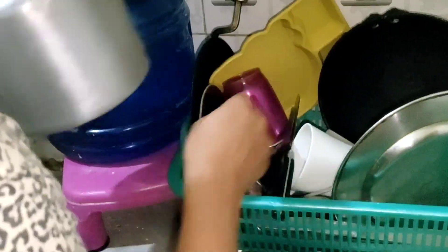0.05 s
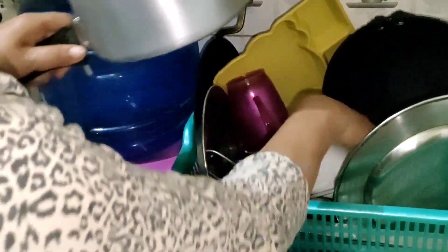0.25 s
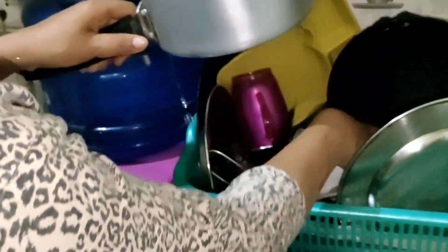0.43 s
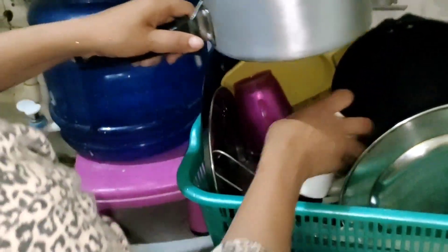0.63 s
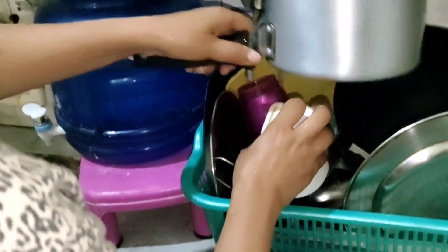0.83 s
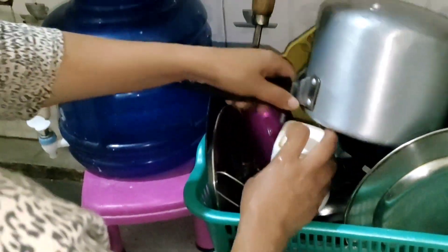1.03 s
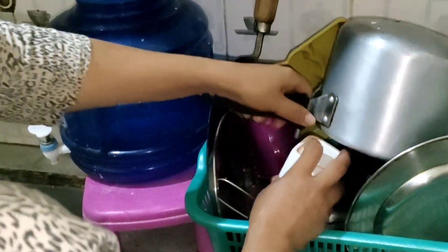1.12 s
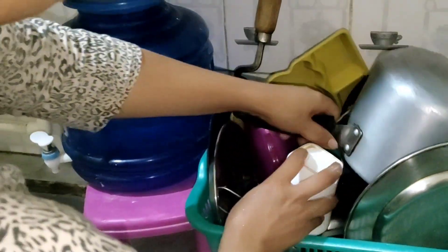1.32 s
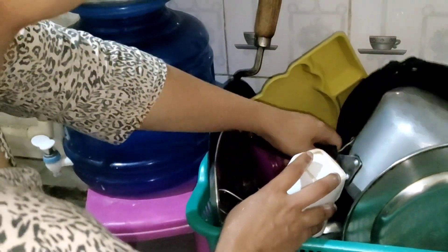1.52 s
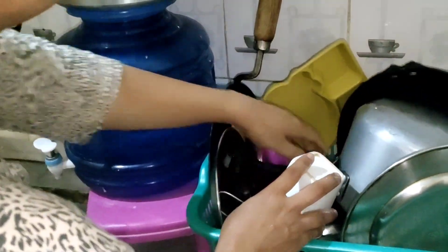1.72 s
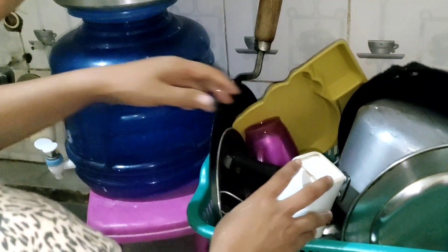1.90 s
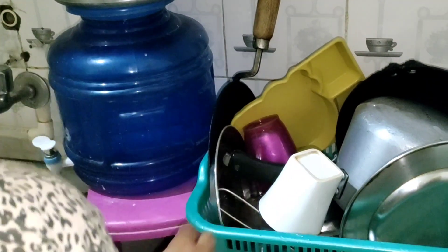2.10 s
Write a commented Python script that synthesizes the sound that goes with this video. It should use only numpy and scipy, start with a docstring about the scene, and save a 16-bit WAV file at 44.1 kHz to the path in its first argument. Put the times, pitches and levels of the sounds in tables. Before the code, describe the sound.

Metal pots and dishes clatter as they are put into a plastic rack. Light ticks open, with firmer knocks from 0.2 s and a dense, loud clatter at 0.55-0.75 s. After a lull, sharp clanks hit around 1.05-1.2 s; another pause, then a run of lower, ringing knocks from 1.48 to 1.85 s fades to faint ticks. Close, hard-walled kitchen, slight clipping, faint hum and hiss.

```python
"""In a small tiled kitchen, washed metal pots and dishes knock together as they are set into a plastic rack.
Each knock is a short click with its own pitch; it rings the pots a little and the hard walls draw it out.
Single pitched notes, mostly short, sound with the knocks: sine waves that start softly and die away.
Two low bands of hum, made of unsteady sine waves, waver over a faint hiss of shaped noise.
The close microphone pair clips on the loudest knocks."""
import sys
import numpy as np
from scipy import signal
from scipy.fft import rfft, irfft, next_fast_len
from scipy.io import wavfile
from scipy.ndimage import uniform_filter1d, map_coordinates

SR = 44100
rng = np.random.default_rng(int(sys.argv[2]) if len(sys.argv) > 2 else 0)


def persist_wave(psi):
    """Save psi, clipped to +-1, as 16-bit WAV."""
    counts = np.round(np.clip(psi, -1, 1) * 32767).astype(np.int16)
    wavfile.write(sys.argv[1], SR, np.atleast_2d(counts).T)


N = 94815  # length in samples
TOP_HZ = 15600  # nothing above this is kept

# How far the left microphone leads the right: (frequency [Hz], lead [radians])
LEAD = [(20, 0), (250, 0), (450, -1), (700, -1.3), (950, 1.1), (1300, 1.8), (1600, 3.5), (2330, 5.8),
        (2930, 5.8), (5000, 7.6), (15000, 7.9)]
# How much louder the left microphone is than the right: (frequency [Hz], level difference [dB])
TILT = [(60, -1), (110, 6), (200, 0), (380, 2), (700, 1.5), (1290, -0.5), (2380, 5.5), (4400, 3),
        (8120, -2.5), (15000, 2.5)]
# One half of a left-right difference for each side
HALVES = np.array([[0.5], [-0.5]])


def amp(db):
    """Turn decibels into a gain."""
    return 10 ** (np.asarray(db) / 20)


def unit(x):
    """Scale a signal to an rms of 1."""
    return x / np.sqrt(np.mean(np.abs(x) ** 2) + 1e-20)


def along(points, hz):
    """Read a curve of (frequency, value) points, spaced as the ear hears pitch (log axis)."""
    point_hz, value = np.transpose(points)
    return np.interp(np.log(hz + 1), np.log(point_hz + 1), value)


def resonance(f, hz, width_hz):
    """One ringing mode as a filter that starts at the hit; it is 1 at its peak, and narrower rings longer."""
    return 1j * f * width_hz / (hz * hz - f * f + 1j * f * width_hz)


def ports(pair, f):
    """Mix two unrelated spectra into left and right with the pair's likeness, level and phase differences."""
    # How alike left and right are: (frequency [Hz], likeness [0 to 1])
    alike = [(100, .97), (300, 0.84), (700, 0.4), (1400, 0.23), (2500, 0.51), (5000, 0.25), (15000, 0.21)]
    turn = np.arccos(np.clip(along(alike, f), 0, 1)) / 2
    mid, side = pair * [np.cos(turn), np.sin(turn)]
    skew = amp(along(TILT, f) / 2) * np.exp(0.5j * along(LEAD, f))
    return np.array([(mid + side) * skew, (mid - side) / skew])


def hiss():
    """Faint steady noise: random samples are shaped over frequency and spread over the microphone pair."""
    # Shape of the hiss: (frequency [Hz], relative level per Hz [dB])
    hiss_shape = [(20, 1), (60, -9), (130, 5), (170, -28), (240, -35), (450, -23), (1000, -12),
                  (1500, -7.5), (2600, -9), (3500, -6), (5000, -20.5), (9000, -20), (13000, -13.5),
                  (15600, -26)]
    level_db = -39.5
    m = next_fast_len(N + 8192)
    f = np.fft.rfftfreq(m, 1 / SR)
    white = rfft(rng.standard_normal((2, m)))
    shaped = ports(white, f) * amp(along(hiss_shape, f))
    return amp(level_db) * unit(irfft(shaped, m)[:, :N])


def wobble(rate):
    """A smooth random curve through `rate` random points a second."""
    points = rng.standard_normal(int(N * rate / SR) + 4)
    return map_coordinates(points, [np.arange(N) * rate / SR])


def hum():
    """Two low groups of sines whose pitch and level wander; each group swells on its own."""
    # Swell of the two groups: (time [s], lower band level [dB], upper band level [dB])
    swell = [(0.0, -58, -25.5), (0.05, -39, -26), (0.13, -62, -28), (0.26, -25, -32), (0.33, -25.5, -34),
             (0.43, -39, -36.5), (0.52, -29, -36), (0.59, -31.5, -34), (0.69, -43, -35), (0.82, -40, -62),
             (0.86, -68, -45.5), (0.99, -50, -33), (1.12, -46, -37), (1.17, -49, -29), (1.23, -46, -33.5),
             (1.29, -59, -38), (1.32, -45, -36), (1.54, -30.5, -42), (1.58, -40, -34), (1.71, -41, -37),
             (1.75, -37, -38.5), (1.89, -34.5, -29.5), (1.96, -46, -35), (1.99, -38, -35.5),
             (2.08, -61, -33), (2.15, -41, -42)]
    # Tones of the lower group: (frequency [Hz], relative level [dB])
    low_tones = [(89.2, -0.5), (49, -15)]
    # Tones of the upper group: (frequency [Hz], relative level [dB])
    high_tones = [(231.2, 3), (258, -2), (321, -14.5), (131, -7.5), (385, -21)]
    pitch_wander, level_wander_db = 0.0199, 4  # pitch as a share of the frequency
    wander_rate = 9.8  # random points a second
    s, *levels = np.transpose(swell)
    out = np.zeros((2, N))
    for level, band in zip(levels, [low_tones, high_tones]):
        tones = 0
        for hz, db in band:
            moving_hz = hz * (1 + pitch_wander * wobble(wander_rate))
            phase = 2 * np.pi * (np.cumsum(moving_hz) / SR + rng.random())
            tilt_db = along(TILT, hz) * HALVES
            tone_db = db + tilt_db + level_wander_db * wobble(wander_rate)
            tones = tones + amp(tone_db) * np.sin(phase)
        out += amp(np.interp(np.arange(N) / SR, s, level)) * unit(tones)
    return out


def kitchen(size, sharp_db, hold_s, soft):
    """A fresh room answer: a crack, first echoes, a patchy, steady start of the tail, then a fade by band."""
    # How long the room rings: (frequency [Hz], time to fall by 60 dB [s])
    room_decay = [(150, 0.33), (500, 0.34), (1500, 0.3), (4000, 0.33), (9000, 0.26), (15000, 0.26)]
    direct_s = 0.012  # the first echoes fall by 60 dB in this time
    hard_fill_s, soft_fill_s = 0.0021, 0.0079  # how slowly the tail builds up
    patchy_db, crack_db = 2, 7
    hz, t, z = signal.stft(rng.standard_normal((2, size)), SR, nperseg=128)

    # Random patches over frequency and time
    patches = uniform_filter1d(rng.standard_normal(z.shape[1:]), size=3, axis=0)
    patches = unit(uniform_filter1d(patches, size=5, axis=1))
    fading_db = -60 * np.maximum(t - hold_s, 0) / along(room_decay, hz)[:, None]
    patchy = z * amp(fading_db + patchy_db * patches)
    tail = signal.istft(patchy, SR, nperseg=128)[1][:, :size]

    t = np.arange(size) / SR
    fill_s = soft_fill_s if soft else hard_fill_s
    first = amp(sharp_db) * hard_fill_s / fill_s
    build_up = 1 - np.exp(-t / fill_s)
    tail = tail * (build_up + first * amp(-60 * t / direct_s))
    tail[0, 0] += first * amp(crack_db)  # one sharp sample, in the part both sides share
    return tail


def knocks():
    """Each contact is a coloured click plus its own short pitches and the pot modes, all through the room."""
    # The knocks: (time [s], level before the shared gain [dB], own pitch [Hz],
    #  low middle over middle [dB], treble over middle [dB], thump over middle [dB],
    #  left minus right [dB], high pitch [Hz], own pitch strength [dB],
    #  high pitch strength before its limit [dB], sharpness [dB], time the tail holds before it fades [s])
    knock_table = [(0.0159, -21.5, 1150, -6, -7, -2, 0, 4000, 11.5, -3, 20.5, 0.026),
                   (0.0512, -21.5, 2450, -45, -5.5, -4, 0, 4030, 9, -15, 9, 0.026),
                   (0.1301, -23, 2340, -14, -1.5, -5, 0.5, 4010, -6, -6, 10, 0.017),
                   (0.1674, -30.5, 3100, -2.5, 0.5, 5, 3, 4000, 16, 1, 23, 0.011),
                   (0.2153, -16, 3400, -34, -8, -28, 0, 13300, 14.5, 10, 4, 0.017),
                   (0.2303, -6, 2610, -4, -2.5, -9, 1, 12700, -3, 16, 6.5, 0.0051),
                   (0.3097, -15.5, 2490, 0.5, -4, -2.5, 1.5, 4170, 12.5, 2, 10, 0.012),
                   (0.328, -16, 2230, -3, -3, -10, 1.5, 4040, 13, -5, 6, 0.0082),
                   (0.398, -17, 1098, -2.5, -3.5, -12, -4.5, 4060, 18.5, -5, 12, 0.017),
                   (0.4225, -8, 2783, -3.5, -8.5, -31, 2, 5600, 15, 10, 3.5, 0.033),
                   (0.4651, -6, 1140, -4, -10.5, -17, 3, 4180, -2, -20, -3, 0.036),
                   (0.4888, -10.5, 2810, -1.5, -7.5, -21, 3, 4030, 10, -24, 9.5, 0.0083),
                   (0.5098, -14, 1260, -6, -2, -16, -4, 4120, 9, -12, 0, 0.014),
                   (0.5672, -14, 2440, -2, -4.5, -10, 3, 4390, 13, -5, 5, 0.015),
                   (0.5828, 3, 1130, -5.5, -4.5, -12.5, 0.5, 14800, -6, 9, 1, 0.018),
                   (0.6094, 0, 2330, -5.5, -2, -39, -5, 14800, -1, 18, 6, 0.012),
                   (0.6348, -1.5, 3020, -1.5, -4.5, -36, 4, 4350, -7, -3, 2, 0.0082),
                   (0.6593, -6.5, 2920, -9, -2.5, -20, 1.5, 4160, -13, 11, 1, 0.036),
                   (0.7086, -2, 1923, -3, -1, -18, -0.5, 4030, 9, 11, 6.5, 0.014),
                   (0.7338, -7.5, 2410, -5, -2.5, -11, 4.5, 4180, -6, 11, 12.5, 0.014),
                   (0.9146, -22.5, 3206, -13.5, -1, -4, 1, 4220, 14.5, 13, 3, 0.036),
                   (0.9549, -22.5, 3210, -21, 2, -3.5, -1, 4120, 14, 13, 3, 0.012),
                   (0.9966, -23, 1190, -4.5, 3.5, -12, 1.5, 4040, 14, 15, 3, 0.036),
                   (1.058, -8, 2960, -6.5, 2, -14, -1, 5570, 14, 1, 3, 0.0067),
                   (1.0809, -12, 2960, -14, -3.5, -25, 4.0, 4300, -4, 10, 11, 0.0087),
                   (1.1132, 4, 2380, -5, -3, -28, -1, 6280, 2.5, 9, 9.5, 0.0068),
                   (1.139, -2.5, 717, -1.5, -0.5, -13, 1, 5640, 9.5, 11, 1, 0.0087),
                   (1.1701, -4.5, 2800, -15, -1, -10, 1.5, 14800, -14, 13, 8, 0.0066),
                   (1.28, -13, 2720, -33, -15, -16, 2.5, 4630, -16, 8, 4, 0.0074),
                   (1.3835, -40, 2520, -21, -23, -1, 5, 4170, 9, 4, 3, 0.012),
                   (1.4397, -27, 1900, -12, 1, -16, 5.5, 14600, 6, 8, -2, 0.03),
                   (1.4756, -16, 1180, -8.5, -2, -10, -4, 4600, 27, 10, 7, 0.012),
                   (1.4853, -2.5, 825, -3, -3.5, -7.5, 1.5, 12500, 15.5, 14, -6, 0.014),
                   (1.5095, -0.5, 670, -9, -6, -9.5, 0, 4390, 12.5, 2, 7, 0.0093),
                   (1.5301, -8, 690, -24, 1, -6, 1, 14100, 18, 6, 4, 0.012),
                   (1.5704, -5.5, 740, -0.5, -3, -8.5, 1, 4350, 8, 10, 2, 0.031),
                   (1.6, -3.5, 770, -6, -6, -5, 0, 4290, 6, 11, 0, 0.012),
                   (1.6188, -6, 1030, -12, -3.5, -35, 0.5, 4240, 18, 12, -1, 0.036),
                   (1.6701, -3.5, 818, -4.5, -6, -16.5, 3, 4270, 11, -2, -5, 0.022),
                   (1.6946, -2.5, 1150, -9.5, -3, -24, -2, 4280, 7, -6, -2, 0.019),
                   (1.7199, -4.5, 1020, -4.5, -5, -11, 1, 4850, 6, 6, 2.5, 0.0092),
                   (1.7449, -13, 780, -11.5, 1.5, -11, 1, 4060, 16, -1, -12, 0.019),
                   (1.8131, -2.5, 2440, -9, 2, -24, 0.5, 4120, -18, 11, 3.5, 0.019),
                   (1.8489, -9, 3000, -7.5, 5, -14.5, 2.5, 12900, -5, 21, 5, 0.016),
                   (1.891, -19, 2320, -31, 3, -5, -3, 14300, 1, 9, 21, 0.0075),
                   (2.0515, -24.5, 2790, -31, -1.5, -3, 2.5, 4850, 16.5, 10, 18, 0.0083),
                   (2.064, -39, 2240, -24, -29.5, -8.5, 3.0, 4750, 11, 15.5, 3, 0.011),
                   (2.1239, -38.5, 2830, -30, 15, 8, 2, 4910, 9, 16, 9, 0.012)]
    # Colour of the click inside each band: (frequency [Hz], relative level per Hz [dB])
    click_shape = [(60, -40), (120, -23), (240, -13), (430, -10), (650, -5), (1100, -1), (1400, -3),
                   (2000, -3.5), (3000, -5), (3600, -11.5), (4300, -12), (5000, -18), (6400, -15.5),
                   (8500, -22), (11000, -18.5), (13000, -16), (15000, -18.5), (15600, -16)]
    # Ringing modes of the pots: (frequency [Hz], width [Hz], middle level over the click [dB])
    pots = [(235, 39, 4), (610, 24.7, -1.5), (694, 10.4, 4.5), (850, 25, -1), (1128, 42, -0.5),
            (1860, 23, -3.5), (2296, 40, -1.5), (2524, 35, -2.5), (2690, 25, -1.5), (3056, 51, 0),
            (4303, 15, 4)]
    pot_scatter_db = 2.5  # each knock rings the modes a little differently
    low_middle_hz, middle_hz, treble_hz = 430, 1400, 4600  # where these bands start
    own_width_hz, high_width_hz, high_most_db = 60, 40, 9
    shared_gain_db, soft_below_db = -5.5, -15.5

    size, lead = 28672, 512  # samples; the lead leaves space ahead of the hit for phase shifts
    m = 2 * size
    f = np.fft.rfftfreq(m, 1 / SR)
    out = np.zeros((2, N + m))
    middle_bins = np.sum((f > middle_hz) & (f < treble_hz))
    edges = [100, low_middle_hz, middle_hz, treble_hz, TOP_HZ]
    bands = [slice(*np.searchsorted(f, e)) for e in zip(edges[:-1], edges[1:])]
    click = amp(along(click_shape, f))
    power = [np.sum(click[b] ** 2) for b in bands]
    modes = np.array([amp(db) * resonance(f, hz, width) for hz, width, db in pots])

    for (s, db, hz, low_db, treble_db, thump_db, pan_db, high_hz,
         own_db, high_db, sharp_db, hold_s) in knock_table:
        # Set the strength of each band, then smooth the steps between bands
        gains = np.full(len(f), amp(thump_db) / np.sqrt(power[0]))
        for b, p, band_db in zip(bands[1:], power[1:], [low_db, 0, treble_db]):
            gains[b.start:] = amp(band_db) / np.sqrt(p)
        gains = np.exp(uniform_filter1d(np.log(gains), size=200)) * np.sqrt(middle_bins)

        own = amp(own_db) * resonance(f, hz, own_width_hz)
        high = amp(min(high_db, high_most_db)) * resonance(f, high_hz, high_width_hz)
        pot_gains = amp(rng.normal(0, pot_scatter_db, len(pots)))
        ring = 1 + own + high + pot_gains @ modes

        room = kitchen(size, sharp_db, hold_s, soft=db <= soft_below_db)
        room = rfft(np.pad(room, ((0, 0), (lead, 0))), m)
        heard = ports(room, f) * click * gains * ring
        at = round(s * SR)
        side_gains = amp(db + shared_gain_db + pan_db * HALVES)
        out[:, at:at + m] += side_gains * irfft(heard, m)
    return out[:, lead:lead + N]


def notes():
    """Single pitched notes, mostly short, sound with the knocks: sines that start softly and die away."""
    # The notes: (time [s], frequency [Hz], level before rise and fade [dB], time to fall by 60 dB [s])
    note_table = [(.214, 3270, -23, .05), (.229, 2715, -6, 0.043), (.229, 2250, -6, 0.038),
                  (0.229, 241, -27, 0.47), (.423, 3025, -8, 0.063), (0.429, 2690, -22, 0.11),
                  (0.465, 1129, -12, 0.12), (0.581, 1103, -9, 0.14), (.59, 245, -16, .2),
                  (.59, 14810, -26, .3), (.6, 839, -13.5, 0.45), (0.609, 2703, -14, 0.17),
                  (.635, 3090, -15, 0.12), (0.707, 1878, -0.5, 0.12), (0.722, 246, -24, 0.14),
                  (.735, 2330, -12, .15), (0.741, 387.4, -24, 0.21), (0.739, 4200, -24, 0.17),
                  (0.954, 3180, -32, 0.058), (0.996, 1150, -19.5, 0.076), (1.058, 2974, -14, .15),
                  (1.114, 6480, -5, 0.064), (1.13, 250, -16, 0.29), (1.135, 681, -14, 0.15),
                  (1.139, 991, -20.5, 0.6), (1.142, 1308, -23, 0.46), (1.14, 14810, -16, .25),
                  (1.149, 2710, -13, 0.17), (1.28, 2780, -20, 0.07), (1.487, 815, -18.5, 0.13),
                  (1.49, 1777, -8, 0.095), (1.488, 196, -20, .2), (1.495, 231.3, -10, 0.35),
                  (1.501, 310, -33, .3), (1.51, 636, -11, 0.34), (1.53, 14810, -19, .2),
                  (1.571, 705, -10, 0.13), (1.614, 1020, -8, 0.17), (1.622, 4240, -14, .2),
                  (1.7, 1096, -16, 0.26), (1.813, 833, -10.5, 0.053), (1.82, 4136, -20, 0.18),
                  (1.82, 14300, -15, .25), (2.051, 2740, -22.5, .1), (2.06, 2200, -25.5, 0.13)]
    rise_s = 0.002
    out = np.zeros((2, N))
    for s, hz, db, t60 in note_table:
        t = np.maximum(np.arange(N) / SR - s, 0)
        phase = 2 * np.pi * hz * t + HALVES * along(LEAD, hz)
        rise = 1 - np.exp(-t / rise_s)
        level_db = db - 60 * t / t60 + HALVES * along(TILT, hz)
        out += amp(level_db) * rise * np.sin(phase)
    return out


def scene():
    """Knocks and single notes over hum and hiss."""
    return hiss() + hum() + knocks() + notes()


def record(dry):
    """The input rounds off peaks near full level, then everything above the band limit is removed."""
    clip_top, clip_hard = 1.0, 12  # full level; a larger second number bends more sharply
    x = dry / (1 + np.abs(dry / clip_top) ** clip_hard) ** (1 / clip_hard)
    m = next_fast_len(N + 8192)
    kept = np.fft.rfftfreq(m, 1 / SR) < TOP_HZ
    return irfft(rfft(x, m) * kept, m)[:, :N]


dry = scene()
out = record(dry)
persist_wave(out)
```